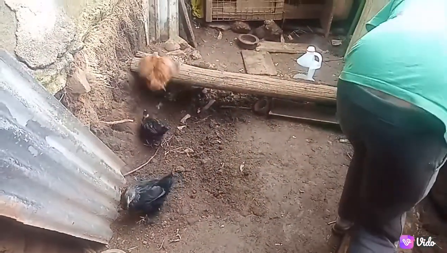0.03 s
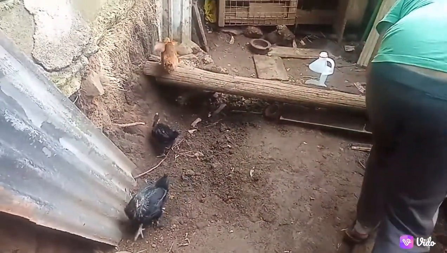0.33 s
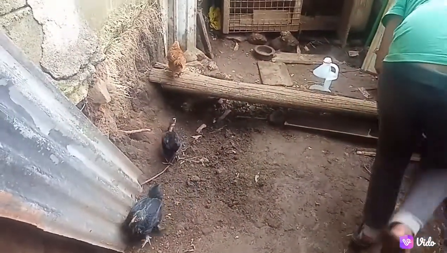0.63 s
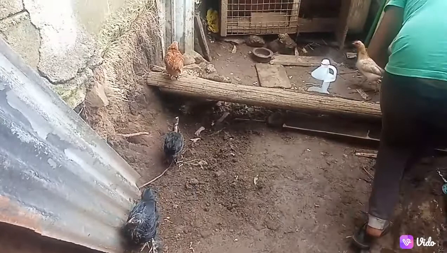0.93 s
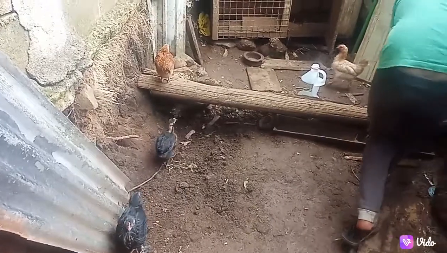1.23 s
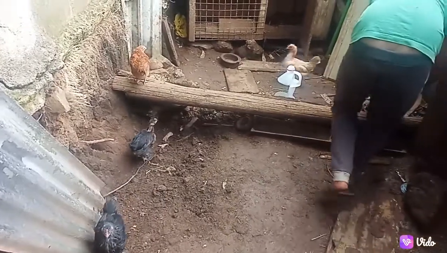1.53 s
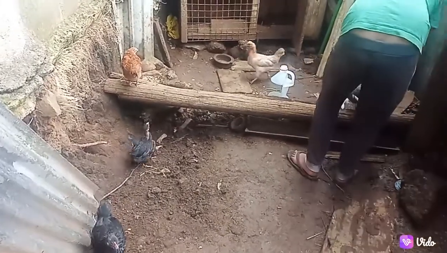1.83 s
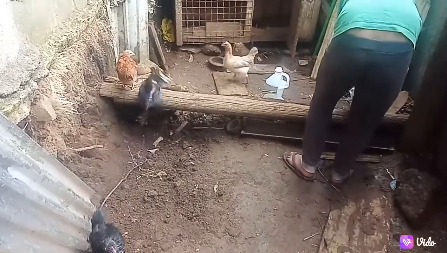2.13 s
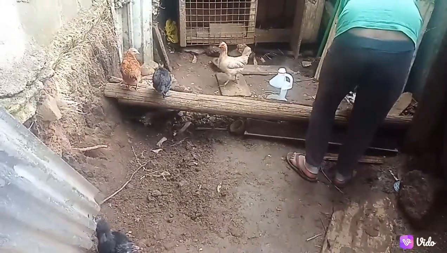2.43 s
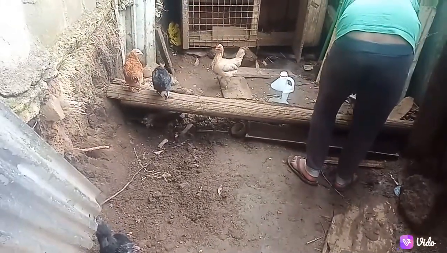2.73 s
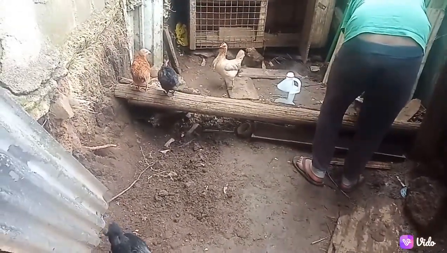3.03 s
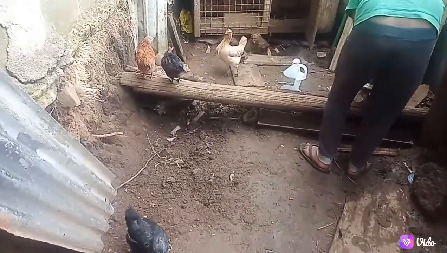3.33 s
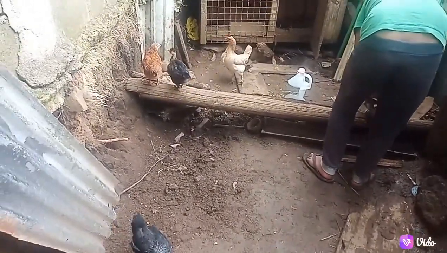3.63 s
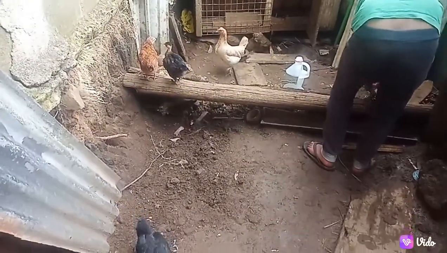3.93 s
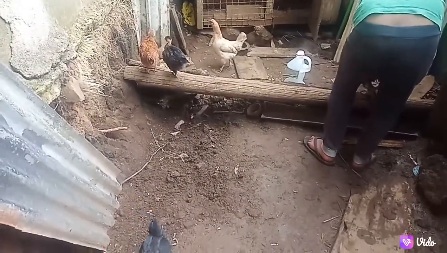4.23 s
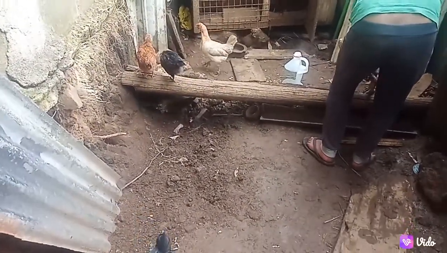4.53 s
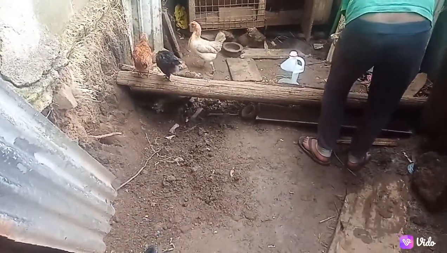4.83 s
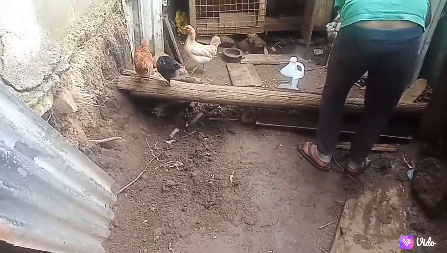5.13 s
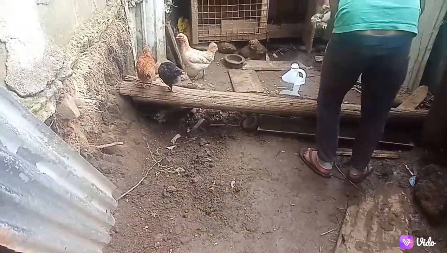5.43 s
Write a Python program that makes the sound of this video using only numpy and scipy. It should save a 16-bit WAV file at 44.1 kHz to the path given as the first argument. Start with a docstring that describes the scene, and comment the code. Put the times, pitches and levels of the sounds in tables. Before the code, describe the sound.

Quick clucks and harsh squawks from chickens, with faint peeps, light scuffs on dirt and low handling thumps.

```python
"""A small walled run: agitated hens cluck about five times a second and break into harsh squawks,
membrane pulses shaped by the throat. A youngster peeps, wings beat, a faint airy tone slides down.
Someone shuffles over the dirt, and the hand-held phone picks up dull bumps and rubbing.
Walls and a sheet of tin give the calls a short ring."""
import sys
import numpy as np
from scipy import signal
from scipy.fft import rfft, irfft
from scipy.io import wavfile
from scipy.ndimage import uniform_filter1d, minimum_filter1d, map_coordinates

SR = 44100
rng = np.random.default_rng(int(sys.argv[2]) if len(sys.argv) > 2 else 0)


def wav_out(sig):
    """Save sig, one row per channel (or a flat mono array), as 16-bit PCM at SR to the path in sys.argv[1]."""
    wavfile.write(sys.argv[1], SR, np.round(np.clip(np.atleast_2d(sig).T, -1, 1) * 32767).astype(np.int16))


N = 246210
TIME_S = np.arange(N) / SR

# peeps: t/s, top pitch/Hz, level/dB
PEEPS = [(0, 3416, -44), (1.021, 3026, -41.5), (1.202, 3226, -46), (1.574, 3340, -52), (1.682, 3280, -44),
         (2.508, 3525, -42.5), (2.647, 3530, -45), (2.85, 3680, -52.5), (4.727, 3120, -41.5)]
# outdoor hush: f/Hz, level/dB
AIR_SPECTRUM = [(18, -39.5), (30, -14), (105, 5), (173, -11.5), (332, -2.5), (467, -8.5), (808, -10.5),
                (921, -15), (1260, -11), (2240, -16.5), (2910, -15.5), (3880, -18.5), (5450, -36),
                (15500, -45.5)]
# strokes of fingers and clothing on the case: t/s, length/s, level/dB
RUBS = [(0.071, .12, -49), (0.451, .35, -52.5), (.962, 0.15, -25.5), (1.192, .23, -32.5),
        (1.444, 0.12, -26.5), (1.587, .15, -34), (1.80, 0.091, -27.5), (1.916, 0.077, -39),
        (2.674, 0.34, -48), (2.907, 0.065, -26), (3.035, 0.12, -25), (3.213, 0.2, -29.5),
        (3.42, .05, -37.5), (3.543, 0.028, -31), (3.617, .32, -44.5), (4.032, .14, -35), (4.319, .15, -39),
        (4.58, .26, -50), (5.291, 0.082, -39.5), (5.463, .04, -46)]
# rubbing: f/Hz, level/dB
RUB_SPECTRUM = [(25, -41.5), (50, -15), (80, -0.5), (150, 3.5), (250, -4.5), (400, -10), (700, -26.5),
                (1500, -60)]
# wingbeats of a hen flying up to the beam: peak t/s, level/dB
WINGBEATS = [(.125, -49.5), (.225, -53), (.298, -51), (.388, -47.5)]
# scuffs: t/s, decay/s, relative level/dB, crispness/dB
SCUFFS = [(.228, 0.013, -48.5, 15), (.442, 0.023, -40, -9.5), (0.49, 0.026, -56, 19),
          (.561, .021, -50.5, 17), (.629, 0.019, -49.5, -5), (.716, 0.018, -53.5, 10.5),
          (1.359, 0.04, -34, -15), (1.423, 0.039, -51, 9), (1.508, 0.13, -42, -17.5),
          (1.885, .04, -53.5, 10.5), (5.070, 0.05, -48.5, -1), (5.485, 0.011, -42.5, -17)]
# crushed dirt: f/Hz, level/dB
DIRT_SPECTRUM = [(150, -3), (500, 12), (1600, 5.5), (2400, 4), (3900, -0.5), (5000, -15.5), (8000, -34),
                 (15000, -34.5)]
# knocks on the case: peak t/s, f/Hz, level/dB
BUMPS = [(.461, 207, -23.5), (1.019, 268, 1.5), (1.024, 221, 1.5), (1.297, 240, -13), (1.378, 271, -5.5),
         (1.541, 260, -17.5), (1.871, 170, -12.5), (2.922, 175, -10.5), (2.962, 232, -16.5),
         (3.178, 143.4, -11.5), (3.976, 177.5, -12), (5.312, 170, -31.5)]
# low clucks: t/s, length/s, f/Hz, level/dB, middle and top band re low band/dB, roughness/0-1
CLUCKS = [(1.238, 0.051, 349.6, -40.5, -14, -22, 0.55), (1.574, 0.066, 406.3, -25, -30, -32, 0.036),
          (1.740, 0.064, 405.5, -23, -17.5, -18, 0.52), (1.926, 0.069, 412, -23.5, -19.5, -18, 0.35),
          (2.125, 0.074, 391, -27.5, -16.5, -15, 0.83), (2.473, .068, 336, -27, -7.5, -18, 0.5),
          (2.732, 0.065, 344, -28, -1.5, -17, 0.64), (2.882, 0.074, 351.6, -25.5, -4, -17, 0.95),
          (3.091, 0.063, 354, -24.5, -9, -17.5, 0.51), (4.283, 0.071, 439.6, -20, -7.5, -7, 0.26),
          (4.542, 0.072, 418, -19, -10.5, -12, 0.31), (4.726, 0.055, 402.5, -18.5, -10, -24.5, 0.25),
          (4.921, 0.062, 411, -18, -9.5, -14.5, .32), (5.17, 0.0494, 431, -35, -10, -20, 0.45),
          (5.306, 0.043, 431, -35, -9, -28, .4)]
# open-beak squawks: columns as CLUCKS
SQUAWKS = [(1.386, 0.04, 569, -25.5, 11, -6.5, 0.063), (2.052, 0.055, 530, -36, -11, -4, 0.25),
           (2.264, 0.08, 658.7, -22, -3.5, -1.5, 0.75), (2.500, 0.12, 635.4, -37, 5.5, -3.5, 0.95),
           (3.232, 0.2, 655.4, -27.5, 2.5, -1.5, 0.56), (3.520, 0.069, 686.5, -27, -9.5, -10, 0.83),
           (3.577, 0.093, 648, -20.5, 2, 1, 0.82), (3.811, .074, 673, -21, -7, -8.5, 0.71),
           (4.006, 0.076, 651.6, -18, -3, -8.5, 1), (4.064, 0.093, 643.5, -14, 5.5, -1, 0.78),
           (4.377, 0.047, 636, -27, 0, -3.5, 0.71)]
# throat responses: f/Hz, gain/dB
CLUCK_THROAT = [(200, -15), (390, -8.5), (520, -3.5), (800, 5), (1050, 3), (1300, 1), (1650, 0),
                (2200, -11.5), (2700, -14), (3150, -5.5), (3800, -17.5), (4700, -40), (6500, -46),
                (8500, -67.5), (14000, -71.5)]
SQUAWK_THROAT = [(300, -19.5), (480, -8), (650, -0.5), (900, 2.5), (1080, -7), (1300, 5), (1550, -12),
                 (1790, -7.5), (2150, -13.5), (2620, 10.5), (3800, 2), (4500, -18.5), (5400, -30),
                 (6400, -29.5), (8500, -51), (14000, -55.5)]
# contact noise, case and wall responses: f/Hz, gain/dB
CONTACT_SPECTRUM = [(200, -19), (450, 6), (800, -13.5), (1500, -23.5), (5000, -59.5)]
CASE_RESPONSE = [(29, -22), (58, 0), (1500, 0), (6000, -30)]
WALL_RESPONSE = [(200, -5), (1000, 3.5), (3500, -.5), (6000, -9), (12000, -7)]
BAND_EDGES_HZ = (1050, 2300, 4500)  # between a call's low, middle, top and edge bands


def undb(db):
    """Decibels to gain."""
    return 10 ** (np.asarray(db) / 20)


def unit(x):
    """Scale to rms 1."""
    return x / np.sqrt(np.mean(x ** 2) + 1e-18)


def add(out, start_s, sound):
    """Mix a sound in at a time."""
    i = max(int(start_s * SR), 0)
    out[i:i + len(sound)] += sound[:max(len(out) - i, 0)]


def colour(x, curve):
    """Filter by a curve of f/Hz, gain/dB."""
    hz, db = np.transpose(curve)
    bins_hz = np.fft.rfftfreq(len(x), 1 / SR) + 1
    return irfft(rfft(x) * undb(np.interp(np.log(bins_hz), np.log(hz), db)), len(x))


def wander(t, rate_hz):
    """Smooth random curve, spread near 1."""
    steps = rng.standard_normal(4096)
    return map_coordinates(steps, [t * rate_hz], order=3, mode="wrap")


def echoes(t, t60_s):
    """Dying cloud of reflections, unit energy."""
    cloud = rng.standard_normal(len(t)) * undb(-60 * t / t60_s) * (t > .001)
    return cloud / np.linalg.norm(cloud)


def youngster(length_s=.056, overtone_db=-39, near_db=-6):
    """Thin, quavering whistles arch and slide down, blurred by nearby ground and boards."""
    out = np.zeros(N)
    t = np.arange(int(length_s * SR)) / SR
    progress = t / length_s
    arch = np.interp(progress, [0, .2, .4, .6, 1], [.93, .99, 1, .94, .74])
    swell = np.sqrt(np.sin(np.pi * progress))
    for start_s, hz, db in PEEPS:
        phase = 2 * np.pi * np.cumsum(hz * (arch + .016 * wander(t, 500))) / SR
        whistle = np.sin(phase) + undb(overtone_db) * np.sin(2 * phase)
        flutter = undb(2.5 * wander(t, 260) - .7)
        peep = undb(db) * unit(swell * whistle) * flutter
        add(out, start_s, peep)
        add(out, start_s, undb(near_db) * signal.fftconvolve(peep, echoes(t, t60_s=.09)))
    return out


def air(level_db=-53, swell_db=1):
    """Faint outdoor hush, swelling slightly."""
    hush = unit(colour(rng.standard_normal(N), AIR_SPECTRUM))
    return hush * undb(level_db + swell_db * wander(TIME_S, .67))


def rubbing(grain_db=2.5, slips_per_s=700, grip_db=-64, attack_s=.012, release_s=.011):
    """Tiny slips on the case; strokes press, hold and let go over the faint creep of the grip."""
    slips = (rng.random(N) < slips_per_s / SR) * rng.standard_normal(N)
    slips *= undb(grain_db * rng.standard_normal(N))
    rub = colour(slips, RUB_SPECTRUM)
    rub /= np.sqrt(uniform_filter1d(rub ** 2, size=1500) + 1e-12)
    pressure = undb(grip_db)
    for start_s, length_s, db in RUBS:
        t = TIME_S - start_s
        stroke = np.clip(t / attack_s, 0, 1) * np.exp(-np.maximum(t - length_s, 0) / release_s)
        pressure = np.maximum(pressure, undb(db) * stroke)
    return rub * pressure


def wings(centre_hz=1380, skirt_octaves=.93, skirt_db=-9, half_beat_s=.029):
    """Feathers push air: soft puffs of noise."""
    ratio = 2 ** skirt_octaves
    hump = [(centre_hz / ratio, skirt_db), (centre_hz, 0), (centre_hz * ratio, skirt_db)]
    feathers = colour(rng.standard_normal(N), [(100, -18), *hump, (4000, -14), (8000, -40)])
    beats = sum(undb(db) * np.exp(-((TIME_S - peak_s) / half_beat_s) ** 2) for peak_s, db in WINGBEATS)
    return unit(feathers * undb(3 * wander(TIME_S, 200))) * beats


def scuffs(grit_db=4, attack_s=.003):
    """Sandals and claws crush dry dirt: bursts of tiny grains."""
    out = np.zeros(N)
    t = np.arange(2 ** 14) / SR
    for start_s, decay_s, db, crisp_db in SCUFFS:
        grains = rng.standard_normal(len(t)) * undb(grit_db * wander(t, 600))
        crunch = colour(colour(grains, DIRT_SPECTRUM), [(1200, .041), (7000, crisp_db)])
        burst = (1 - np.exp(-t / attack_s)) * np.exp(-t / decay_s)
        add(out, start_s, 2.2 * undb(db) * unit(crunch) * burst)
    return out


def bumps(contact_db=-21, ref_hz=170, ref_cycles=.99, hardness=2.1):
    """Soft knocks of about one cycle, with contact noise; harder contact is higher and shorter."""
    out = np.zeros(N)
    t = np.arange(-2048, 2048) / SR
    for peak_s, hz, db in BUMPS:
        turns = t * hz
        width_cycles = ref_cycles * (ref_hz / hz) ** hardness
        swell = 1 / np.cosh(2 * turns / width_cycles)
        body = np.cos(2 * np.pi * (turns + rng.random()) + .5 * wander(t - t[0], 151.7))
        contact = unit(colour(rng.standard_normal(len(t)), CONTACT_SPECTRUM))
        add(out, peak_s + t[0], undb(db) * swell * (body + undb(contact_db) * swell * contact))
    return out


def far_tone(start_s=.91, length_s=.36, from_hz=1660, to_hz=1346, width_hz=330, level_db=-52):
    """Narrow, airy tone, perhaps a far bird: swells and fades as it slides down."""
    t = np.arange(int(length_s * SR)) / SR
    progress = t / length_s
    phase = 2 * np.pi * np.cumsum(from_hz + (to_hz - from_hz) * progress) / SR
    tone = wander(t, width_hz) * np.cos(phase) + wander(t, width_hz) * np.sin(phase)
    swell = np.sqrt(np.sin(np.pi * progress))
    out = np.zeros(N)
    add(out, start_s, undb(level_db) * unit(tone * swell))
    return out


def syrinx(t, pitch_hz, rough, slow_ratio, jitter, side_depth, rasp):
    """Membrane pulses; roughness adds wobble, side tones from a slower vibration, and hiss."""
    wobble = jitter * (rough * wander(t, 450) + .22 * wander(t, 80))
    phase = 2 * np.pi * np.cumsum(pitch_hz * (1 + wobble)) / SR
    harmonics = range(1, int(SR / 3 / pitch_hz.max()))
    lags = 2 * np.pi * rng.random(64)
    pulses = unit(sum(np.cos(k * phase + lags[k]) for k in harmonics))
    slow_phase = slow_ratio * phase + wander(t, 73.9)
    beats = np.cos(slow_phase) + .5 * np.cos(2 * slow_phase) + 1.05 * wander(t, 502.6)
    breath = unit(rng.standard_normal(len(t)) * (1 + .27 * np.cos(slow_phase)))
    return pulses * (1 + side_depth * rough * beats) + rasp * rough * breath


def call(row, throat, scoop, onset_rough, edge_re_top_db=-25.5, **voicing):
    """Syrinx through the throat: pitch rises from a dull, gritty onset, arches, then sags."""
    length_s, hz, db, middle_db, top_db, rough = row
    rise_s = min(.01405 + .1567 * length_s, length_s / 2)
    fall_s = .27 * length_s
    hold_s = length_s - rise_s - fall_s
    t = np.arange(2 ** 14) / SR
    closed = np.clip(1.5 * (1 - t / rise_s), 0, 1)
    sag = .03 * np.clip((t - rise_s) / (hold_s + fall_s), 0, 1) ** 2
    arch = .045 * (np.sin(np.pi * np.minimum(t / length_s, 1)) - np.pi / 4)
    pitch_hz = hz * (1 - scoop * closed + arch - sag)
    source = syrinx(t, pitch_hz, np.clip(rough + onset_rough * closed, 0, 1), **voicing)
    knots_s = np.cumsum([0, rise_s / 3, 2 * rise_s / 3, hold_s / 2, hold_s / 2, fall_s])
    effort = np.interp(t, knots_s, [0, .28, .88, 1, .8, 0])
    effort = np.maximum(uniform_filter1d(effort, size=260), 0) * undb(1.1 * wander(t, 65))
    # ground and boards scatter each call differently as the head turns
    scatter = 1 + .8 * rfft(echoes(t, t60_s=.11))
    band = np.digitize(np.fft.rfftfreq(len(t), 1 / SR), BAND_EDGES_HZ)
    voice = 0
    for k, band_db in enumerate([0, middle_db, top_db, top_db + edge_re_top_db]):
        swell = effort ** (1.2 + np.sqrt(k))  # upper resonances need a wide-open beak
        spectrum = rfft(colour(source * swell, throat)) * scatter
        band_mask = uniform_filter1d(1. * (band == k), size=60)
        voice = voice + undb(band_db) * unit(irfft(spectrum * band_mask))
    duty = (hold_s + (rise_s + fall_s) / 3) / t[-1]
    return unit(voice) * undb(db) * np.sqrt(duty)


def hens():
    """Low, scooping clucks with higher open-beak squawks between them."""
    out = np.zeros(N)
    for start_s, *row in CLUCKS:
        add(out, start_s, call(row, CLUCK_THROAT, scoop=.23, onset_rough=.35,
                               slow_ratio=.5, jitter=.085, side_depth=.8, rasp=.6))
    for start_s, *row in SQUAWKS:
        add(out, start_s, call(row, SQUAWK_THROAT, scoop=.05, onset_rough=.1,
                               slow_ratio=.4, jitter=.045, side_depth=1, rasp=.55))
    return out


def yard(x, tail_db=-17, tail_t60_s=.26, ring_hz=815, ring_db=-18, ring_t60_s=.5):
    """Walls return a thin tail; one note lingers between them."""
    t = np.arange(2 ** 15) / SR
    tail = colour(echoes(t, tail_t60_s), WALL_RESPONSE)
    fade = undb(-60 * t / ring_t60_s)
    ring = 2 * np.cos(2 * np.pi * ring_hz * t) * fade / fade.sum()
    return x + signal.fftconvolve(x, undb(tail_db) * tail + undb(ring_db) * ring)[:N]


def phone_case(push, limit=.7):
    """The case yields under the hardest push and cuts deep bass and treble."""
    return colour(limit * np.tanh(push / limit), CASE_RESPONSE)


def scene():
    """Birds and feet sound in the yard; handling reaches the microphone through the case."""
    airborne = yard(hens() + youngster() + wings() + far_tone() + scuffs())
    handling = phone_case(bumps() + rubbing())
    return (airborne + handling + air())[None]


def record(dry, ceiling=.74, top_hz=15500):
    """The phone's limiter eases peaks down; a low-pass cuts the top."""
    needed_gain = np.minimum(ceiling / (np.abs(dry) + 1e-9), 1)
    gain = uniform_filter1d(minimum_filter1d(needed_gain, size=300), size=300)
    lowpass = signal.ellip(8, .2, 70, top_hz, fs=SR, output="sos")
    return signal.sosfilt(lowpass, dry * gain)


dry = scene()
out = record(dry)
wav_out(out)
```